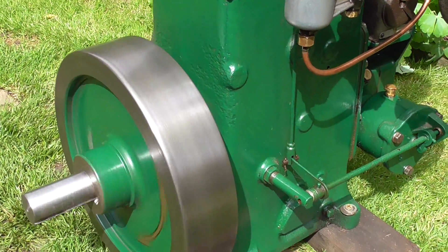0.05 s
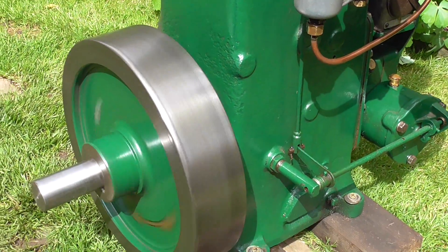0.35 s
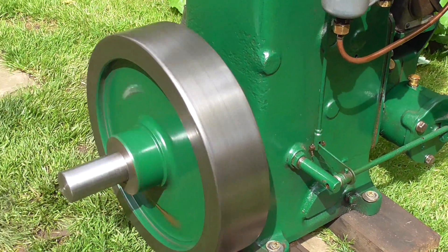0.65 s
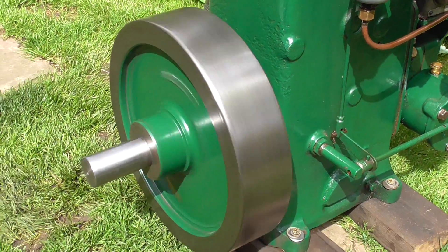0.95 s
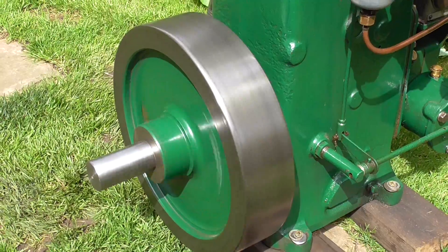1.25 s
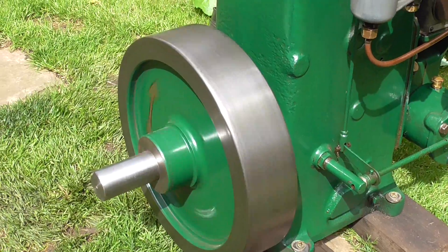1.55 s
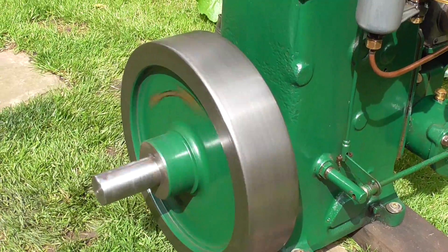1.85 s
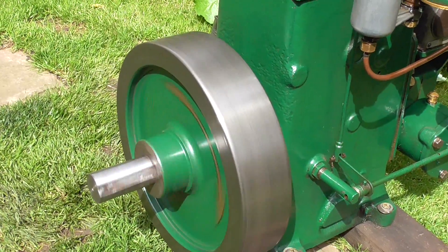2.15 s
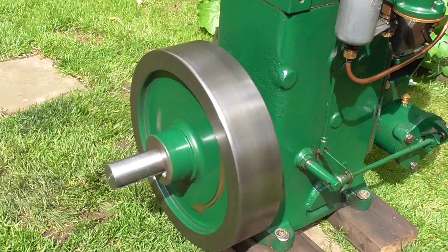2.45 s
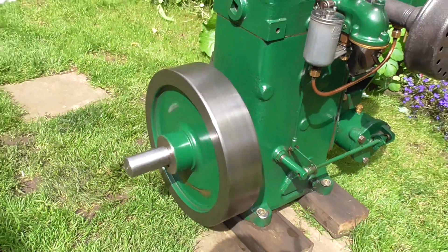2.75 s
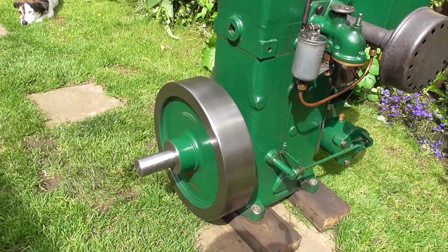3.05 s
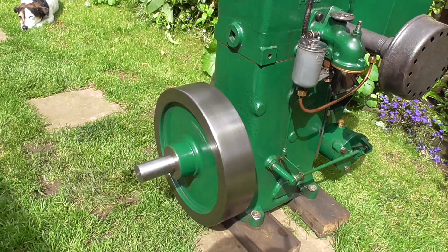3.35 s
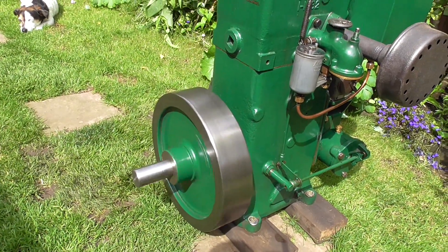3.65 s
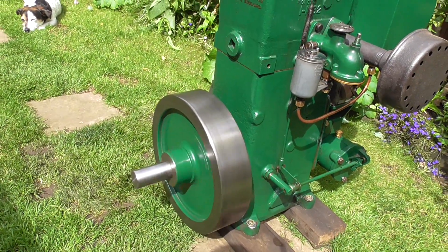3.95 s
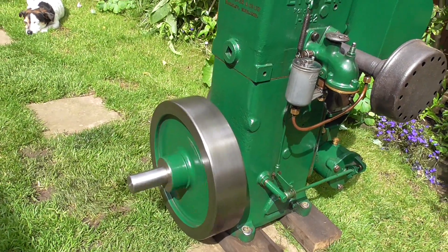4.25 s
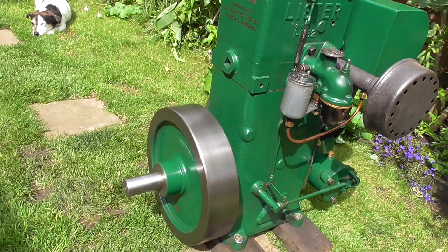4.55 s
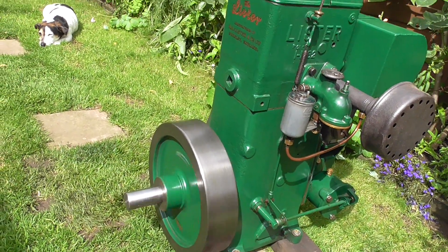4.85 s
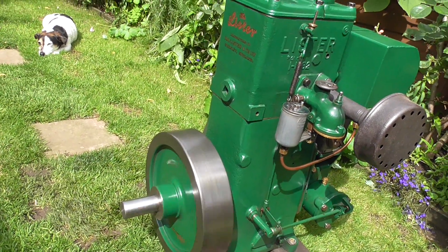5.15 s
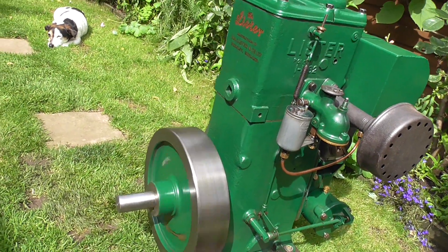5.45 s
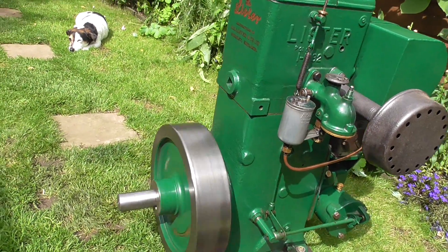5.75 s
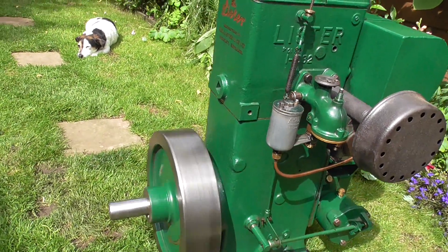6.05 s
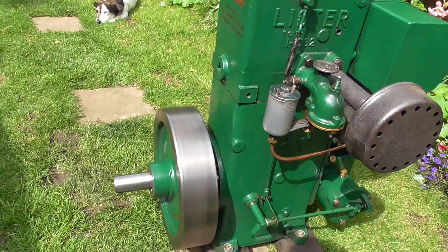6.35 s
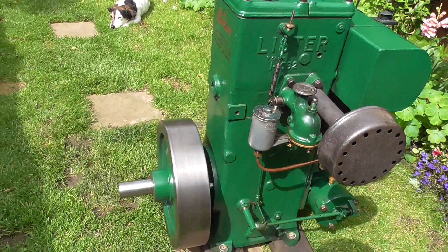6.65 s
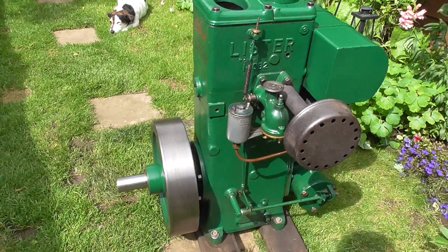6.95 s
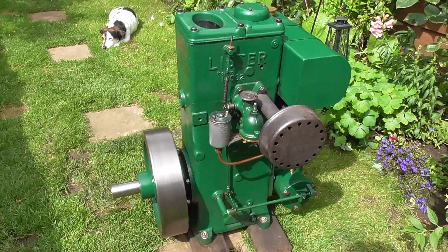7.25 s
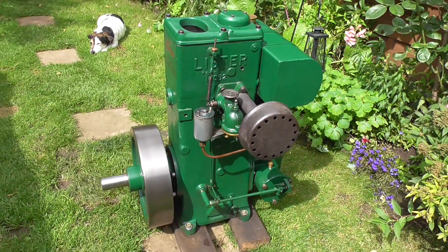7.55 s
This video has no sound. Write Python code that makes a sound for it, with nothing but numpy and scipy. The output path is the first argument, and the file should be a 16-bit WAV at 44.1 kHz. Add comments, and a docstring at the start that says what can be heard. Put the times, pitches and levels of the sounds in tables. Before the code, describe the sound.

A single-cylinder stationary engine runs steadily on a lawn, about a metre from the microphone. Its exhaust barks roughly eight times a second, each beat with a thump and a raspy puff, and now and then a firing is weaker. Valves and rods clatter, the iron body rings faintly and bearings whirr beneath. Near the end the microphone moves round to the silencer, and the sound becomes sharper and hissier.

```python
"""The exhaust of a single-cylinder four-stroke engine barks on a lawn, a metre away, at about 1000 rpm.
Once in two turns the blowdown excites the drum silencer's resonances, with a thump and a turbulent jet;
every few cycles the firing is weak. The intake gulps air, valve-gear impacts ring the iron casting and
the flywheel, and bearings and gears whirr beneath. Late on, the listener steps round from the flywheel
side to face the silencer, and the directivity of the sources changes the timbre."""
import sys
import numpy as np
from scipy import signal
from scipy.fft import rfft, irfft
from scipy.io import wavfile

SR = 44100
rng = np.random.default_rng(int(sys.argv[2]) if len(sys.argv) > 2 else 0)


def dump_mix(stems):
    """Bounce the given channels to the path in sys.argv[1] as a 16-bit WAV at rate SR."""
    frames = np.atleast_2d(stems).T  # one column per channel
    limited = np.clip(frames, -1, 1)  # hard clip at full scale
    pcm = np.round(limited * 32767).astype(np.int16)
    wavfile.write(sys.argv[1], SR, pcm)


N = 334713
CYCLES = 64
HZ = np.fft.rfftfreq(N, 1 / SR)
AGE_MS = np.arange(int(.4 * SR)) * 1000 / SR  # time axis of one event
FULL_JET_DB = 3.74

# spectrum of a tappet or rod-joint impact: (frequency [Hz], level [dB])
TAPPET_SPECTRUM = [(500, -21), (1700, -22.5), (2500, -33), (3500, -25.5), (4600, -18.5), (6000, -47),
                   (9000, -52), (13000, -60), (15500, -63)]
# treble trend, which each source follows in its own proportion: (time [s], level [dB])
TREBLE = [(0, -2.5), (3.4, -1.8), (5.2, 1.5), (6.5, 2.6), (7.5, 5.5)]


def undb(db):
    """Amplitude ratio of a level in decibels."""
    return 10 ** (np.asarray(db) / 20)


def along(points):
    """Interpolation of (frequency [Hz], value) points on a logarithmic frequency axis."""
    hz, value = np.transpose(points)
    return np.interp(np.log(HZ + 1), np.log(hz), value)


def follow(points, times):
    """Linear interpolation of each column of a (time [s], value, ...) table."""
    s, *columns = np.transpose(points)
    return np.array([np.interp(times, s, column) for column in columns])


def walk(hz):
    """Slow random modulation with a standard deviation near 1."""
    knots = np.arange(N) * hz / SR
    count = int(knots[-1]) + 2
    return 1.197 * np.interp(knots, np.arange(count), rng.standard_normal(count))


def scatter(spread):
    """Cycle-to-cycle variation: one Gaussian value for each cycle."""
    return spread * rng.standard_normal(CYCLES)


def ripple(spacing_hz, depth_db):
    """Modal overlap: the many small modes of the ironwork make its spectrum uneven."""
    knots = np.arange(0, SR / 2 + spacing_hz, spacing_hz)
    return undb(depth_db * np.interp(HZ, knots, rng.standard_normal(2000)[:len(knots)]))


def noise(gain, grain_db=0):
    """Shaped stereo noise, less coherent in the treble; fast amplitude modulation makes it crackle."""
    # side signal relative to mid: (frequency [Hz], level [dB])
    incoherence = [(100, -21), (500, -16.5), (1200, -14.5), (2500, -14), (4500, -10), (8000, -10),
                   (14000, -5)]
    mid, side = (rfft(rng.standard_normal(N) * undb(grain_db * walk(2500))) for _ in range(2))
    side = side * undb(along(incoherence))
    return irfft(np.array([mid + side, mid - side]) * gain, N) / np.std(irfft(mid, N))


def play(times, db, shapes):
    """Superposition of one shape, or one for each time, at the given times and levels."""
    pad = SR // 10
    out = np.zeros(N + 2 * pad + 2 * len(AGE_MS))
    shapes = np.broadcast_to(shapes, (len(times), len(AGE_MS)))
    for s, gain, shape in zip(times, undb(db), shapes):
        start = max(int(round(s * SR)) + pad, 0)
        out[start:start + len(shape)] += gain * shape
    return out[pad:pad + N]


def wave(delay_ms, hz, swell_ms, db):
    """A damped gas resonance that swells and dies within a few periods."""
    age = np.maximum(AGE_MS - delay_ms, 0)
    envelope = age / swell_ms * np.exp(1 - age / swell_ms)
    return undb(db) * envelope * np.sin(2 * np.pi * hz * age / 1000)


def burst(times, db, rise_ms, decay_ms):
    """Transient envelopes: a smooth rise and an exponential decay at each time."""
    shape = (1 - np.exp(-AGE_MS / rise_ms)) ** 2 * np.exp(-AGE_MS / decay_ms)
    return play(times, db, shape / shape.max())


def ring(times, db, modes):
    """Free vibration of struck metal: each blow excites the damped modes in different proportions."""
    age, out = AGE_MS / 1000, 0
    for hz, t60, mode_db in modes:
        mode = np.sin(2 * np.pi * hz * age) * np.exp(-np.log(1000) * age / t60)
        out = out + play(times, db + mode_db + scatter(1.7), mode)
    return out


def crank(degrees):
    """Angle is the integral of speed: each cycle's time [s] at this angle past exhaust opening."""
    # slow drift under the governor: (time [s], speed [rpm])
    speed = [(0.0, 1020.7), (0.6, 1016.9), (0.8, 1025.6), (1.5, 1025.0), (2.4, 1033.9), (2.9, 1020.6),
             (4.3, 992.4), (5.4, 986.1), (5.6, 980.9), (5.8, 996.7), (6.8, 1009.6), (7.5, 1010.5)]
    t = -0.009 + np.arange(8000) / 1000  # from the first exhaust opening
    turns = np.cumsum(follow(speed, t)[0] / 60) / 1000
    return np.interp(2 * np.arange(CYCLES) + degrees / 360, turns - turns[0], t)


def facing(times):
    """Listening angle: 0 beside the flywheel, 1 in front of the silencer."""
    return np.interp(times, [5.65, 6.4], [0, 1])


def beam(x, treble_db, presence_share):
    """Directivity: the top octave beams forward, while the band near 4 kHz leaves by the flywheel side."""
    top = irfft(rfft(x) / (1 + (7000 / (HZ + 1)) ** 6), N)
    presence = irfft(rfft(x) * np.exp(-((HZ - 4200) / 900) ** 2), N)
    return x + top * (undb(treble_db) - 1) + presence * (undb(-presence_share * treble_db) - 1)


def bearings():
    """Friction in bearings and timing gears radiates a continuous, fluttering broadband whirr."""
    # whirr: (frequency [Hz], level [dB])
    spectrum = [(25, -57), (55, -39), (115, -21.5), (230, -22), (305, -28.5), (370, -20.5), (620, -19.5),
                (800, -26.5), (1200, -28), (2000, -37.5), (2800, -43), (4400, -36), (6000, -46.5),
                (8000, -38.5), (14500, -52)]
    whirr = noise(undb(along(spectrum)) * ripple(spacing_hz=25.64, depth_db=2), grain_db=1)
    return whirr * undb(2.53 * walk(60))


def flywheel(t):
    """Bell-like modes of the rim ring at each blow of the exhaust valve."""
    # rim modes: (frequency [Hz], T60 [s], level [dB])
    modes = [(487.3, 0.6, -37), (454.5, 0.22, -46)]
    # highest while the listener leans over the rim: (time [s], gain [dB])
    proximity = [(0, 8), (0.55, 8.5), (1.2, -1), (3.0, -6), (7.5, 1)]
    return ring(crank(230 + scatter(3.6)), 0, modes) * undb(follow(proximity, t)[0])


def casting():
    """Impact excitation: the iron body rings as the exhaust valve seats and the cam follower lands."""
    # crankcase and water hopper modes: (frequency [Hz], T60 [s], level [dB])
    modes = [(358.5, 1, -43.5), (389, 0.46, -47.5), (559, 0.28, -46), (603, 0.54, -49), (657, 0.45, -46),
             (813, .25, -60), (1016, 0.23, -47), (1190, .25, -46), (1340, 0.21, -66), (1616, 0.084, -40.5),
             (1707, 0.081, -37.5), (3870, 0.1, -47.5), (3860, .08, -45), (4450, 0.052, -39.5),
             (4960, .05, -43)]
    seating = ring(crank(230 + scatter(3)), 0, modes)
    landing = ring(crank(350.4 + scatter(3)), -5, modes)
    return seating + landing


def linkage():
    """Backlash: loose rod joints tick three times a cycle while the valves move."""
    ticks = 0
    for _ in range(3):
        times = crank(rng.uniform(174, 400, CYCLES))
        ticks = ticks + burst(times, 0.5 + scatter(3.2), rise_ms=0.21, decay_ms=0.97)
    return ticks * noise(undb(along(TAPPET_SPECTRUM)))


def valve_gear():
    """Impact noise: tappet, valves and cam follower knock near set crank angles, never twice alike."""
    # spectra of the impacts: (frequency [Hz], level [dB])
    exhaust_seat = [(120, -41), (450, -13), (1000, -12), (1400, -26.5), (1720, -17), (1950, -37),
                    (2250, -18.5), (2800, -29), (4300, -24), (6000, -32.5), (7600, -25), (9000, -30.5),
                    (12000, -32), (15000, -77)]
    follower = [(120, -48.5), (450, -28), (900, -24), (1700, -28), (2900, -37.5), (3950, -19), (4700, -46),
                (6500, -26.5), (9000, -36.5), (15000, -40)]
    inlet_seat = [(500, -21), (1600, -23.5), (3000, -32.5), (4300, -25), (6000, -44.5), (8000, -23),
                  (11500, -23), (13000, -29), (15500, -44)]
    out, iron = 0, ripple(spacing_hz=149, depth_db=-0.5)
    for degrees, rise_ms, decay_ms, spectrum in [
            (187, 0.77, 3.1, TAPPET_SPECTRUM), (230, 0.54, 13.7, exhaust_seat),
            (350.4, 4.7, 5.6, follower), (397, 1.34, 3.6, inlet_seat)]:
        knocks = burst(crank(degrees + scatter(2.7)), scatter(1.6), rise_ms, decay_ms)
        out = out + knocks * noise(undb(along(spectrum)) * iron, grain_db=1.5)
    return out


def intake(opens, db):
    """Suction draws a turbulent gulp through the carburettor, which hoots briefly and always hisses."""
    # inrushing air: (frequency [Hz], level [dB])
    gulp_spectrum = [(100, -42), (300, -6), (560, -6), (800, -9), (1200, -12), (2000, -23.5), (6000, -33)]
    # narrow hiss bands: (frequency [Hz], bandwidth [Hz], level [dB])
    bands = [(7560, 400, -30.5), (12760, 340, -33.5), (15550, 450, -44)]
    hoot = play(opens + scatter(0.00012), db, wave(delay_ms=28.5, hz=595.5, swell_ms=5.5, db=-17.5))
    gulp = burst(crank(157), db, rise_ms=2.5, decay_ms=5.8) * noise(undb(along(gulp_spectrum)))
    hiss = noise(sum(undb(level) / (1 + (2 * (HZ - hz) / width) ** 2) for hz, width, level in bands))
    return hoot + gulp + hiss * undb(2 * walk(25))


def firings(opens):
    """Combustion variability and listening angle set each cycle's levels [dB] and outflow lag [ms]."""
    # late or poor burns against a full firing: (time [s], crack [dB], drum [dB], thump [dB])
    weak_firings = [(0.11, -8, -5, 5.5), (0.34, -18, -5, 1.5), (0.58, -16, -7.5, 3), (1.05, -3, -0.5, -1.5),
                    (1.17, -9, -1, 0.5), (1.28, -10, -7, -2), (1.98, -8, -10.5, -4.5), (2.22, -9, -4, -2),
                    (2.45, -7, -15, -8), (3.51, -6, -10, -3), (4.11, -10, -20, -7.5), (4.59, -4, -19, -2.5),
                    (4.83, -12, -9, -3), (5.68, -4, -24, -7.5), (6.64, -9, -11, -3), (6.88, -16, -9, -4.5),
                    (7.12, -14, -4, -2), (7.36, -5, -26, -5)]
    change = np.zeros((CYCLES, 3))
    for s, *levels in weak_firings:
        change[np.argmin(abs(opens - s))] = levels
    crack, drum, thump = change.T
    front, treble_db = facing(opens), follow(TREBLE, opens)[0]
    crack_db = 0.3 + scatter(2.7) + crack + 2 * front
    drum_db = 0.33 + scatter(0.44) + drum - 7 * front
    thump_db = 0.71 + scatter(0.46) + thump - 2.5 * front
    lag_ms = 0.1 + 0.1 * thump  # a bigger slug of gas leaves the pipe later
    jet_db = FULL_JET_DB + scatter(1) + 0.34 * (crack + drum) + 0.96 * treble_db - 3 * front
    intake_db = -4.5 + scatter(1.34) + np.minimum(-0.9 * drum, 4.5) - 4 * front  # weak cycles gulp louder
    return crack_db, drum_db, thump_db, lag_ms, jet_db, intake_db


def shell(opens, drum_db):
    """Structural resonance: each pressure pulse rings the silencer's steel wall."""
    # wall modes: (frequency [Hz], T60 [s], level [dB])
    modes = [(260, 0.26, -31.5), (505, 0.45, -36), (627, 0.23, -26.5)]
    return ring(opens, drum_db, modes)


def whistle(opens, tone_hz=1120, bend_hz=71.4, peak_ms=18.45, width_ms=12.7):
    """Flow excitation: the silencer's upper mode sings hoarsely, bending as the piston expels gas."""
    bend = (scatter(bend_hz) + bend_hz / 2)[:, None] * (1 - np.minimum(AGE_MS / peak_ms, 2))
    hz = (tone_hz + scatter(38.4))[:, None] + bend
    rasp = .035 * rng.standard_normal(hz.shape)
    phase = np.cumsum(2 * np.pi * hz / SR + rasp, axis=1) + 2 * np.pi * scatter(0.99)[:, None]
    swell = np.exp(-((AGE_MS - peak_ms) / width_ms) ** 2) * np.minimum(AGE_MS / 5, 1)
    return play(opens, -26.5 + scatter(2.3), swell * np.sin(phase)) * undb(5.2 * walk(250))


def blare(opens, jet_db, front, side_hz=1145, front_hz=839):
    """Turbulence at the jet's height sounds a ragged tone whose pitch depends on the listening angle."""
    hz = side_hz + (front_hz - side_hz) * front + 130 * walk(500)
    envelope = burst(opens + 0.0051, -23 + jet_db / 2, rise_ms=1.8, decay_ms=3.14)
    return envelope * np.sin(2 * np.pi * np.cumsum(hz) / SR)


def face_chamber(opens, jet_db):
    """Cavity resonance: the blowdown rings the chamber behind the silencer's perforated face."""
    upper = wave(delay_ms=1, hz=815, swell_ms=3.5, db=-19)
    lower = wave(delay_ms=0, hz=429, swell_ms=3.5, db=-21.5)
    return -play(opens, jet_db - FULL_JET_DB, upper + lower)


def gas_jet(opens, jet_db):
    """Turbulent mixing: gas rushing from the silencer's holes hisses, then roars."""
    # the two stages of the jet: (frequency [Hz], level [dB])
    hiss_spectrum = [(300, -19.5), (1500, -23.5), (2900, -31.5), (3900, -24.5), (4700, -20), (5800, -31),
                     (7800, -21.5), (9000, -24), (11500, -41), (15500, -57)]
    roar_spectrum = [(100, -55), (300, -14), (600, 0.5), (800, -14), (1100, -5), (1400, -12.5),
                     (2000, -27.5), (4000, -36.5)]
    hiss = noise(undb(along(hiss_spectrum)) * ripple(spacing_hz=234, depth_db=0.5), grain_db=3)
    roar = noise(undb(along(roar_spectrum)))
    return (hiss * burst(opens + 0.00049, jet_db, rise_ms=5.2, decay_ms=3.22)
            + roar * burst(opens + 0.0048, jet_db / 2, rise_ms=1.55, decay_ms=3.44))


def exhaust(opens, crack_db, drum_db, thump_db, lag_ms):
    """Blowdown excites the silencer's air modes; the gas slug leaves, is sucked back and rebounds."""
    crack = wave(delay_ms=0.08, hz=958, swell_ms=1.1, db=-15.5)
    drum = wave(delay_ms=-0.22, hz=613.5, swell_ms=2.5, db=-7.5)
    outflow = wave(delay_ms=1.52, hz=101, swell_ms=5.5, db=-24)
    suction = wave(delay_ms=6.5, hz=129.5, swell_ms=5, db=-17.5)
    rebound = wave(delay_ms=11, hz=194.5, swell_ms=3.5, db=-16.5)
    bark = -play(opens, crack_db, crack) - play(opens, drum_db, drum)
    thump = play(opens + lag_ms / 1000, thump_db, outflow - suction + rebound)
    return bark + thump


def scene():
    """Free-field superposition of the engine's gas flow and vibrating metal."""
    # proximity of the listener: (time [s], engine block gain [dB], valve gear gain [dB])
    nearness = [(0, 4, 0.4), (0.6, 4, -0.2), (1.4, 2, -4), (2.4, 4, -0.4), (3.2, 1.2, -2), (4.3, 1.3, -3),
                (5.1, 2.7, 0.5), (6.3, 0, -3.5), (6.9, 0.8, -2.5), (7.5, 4.5, -1.2)]
    t, opens = np.arange(N) / SR, crank(0)
    crack_db, drum_db, thump_db, lag_ms, jet_db, intake_db = firings(opens)
    block_db, gear_db = follow(nearness, t)
    treble_db, front = follow(TREBLE, t)[0], facing(t)
    whirr = bearings()
    tones = whistle(opens) * undb(-0.55 * treble_db - 3.5 * front)  # strongest to the side
    tones += blare(opens, jet_db, front) * undb(0.13 * treble_db)
    pulses = exhaust(opens, crack_db, drum_db, thump_db, lag_ms) + front * face_chamber(opens, jet_db)
    gas = pulses + tones + gas_jet(opens, jet_db) + intake(opens, intake_db)
    gas = beam(gas, 0.37 * treble_db, presence_share=1.7)
    gear_treble_db = treble_db + front  # the valve gear faces forward
    clatter = beam(valve_gear() + linkage(), gear_treble_db, presence_share=0.58) * undb(gear_db)
    return gas + shell(opens, drum_db) + clatter + flywheel(t) + (casting() + whirr) * undb(block_db)


def record(dry, low_cut_hz=64, top_hz=15750):
    """Two closely spaced, band-limited receivers differ a little in level and phase."""
    # left minus right: (frequency [Hz], level [dB])
    balance = [(160, 1), (350, 0.5), (650, -0.5), (1200, -2), (2400, -0.2), (4400, -3.5), (8100, 3),
               (12000, -2.5), (15000, -1.5)]
    # lead of the left channel: (frequency [Hz], phase [rad])
    lead = [(170, -0.12), (450, -0.28), (780, -0.41), (1100, -0.39), (2800, -0.21), (7200, 0.19),
            (8270, -1.6), (9300, -1.5), (10100, -1.8), (11900, -0.93), (14200, -1), (15500, .6)]
    half = undb(along(balance) / 2) * np.exp(.5j * along(lead))
    low_cut = 1 / np.sqrt(1 + (low_cut_hz / (HZ + 1)) ** 4)
    stereo = irfft(rfft(dry) * low_cut * np.array([half, 1 / half]), N)
    return signal.sosfilt(signal.ellip(14, .1, 80, top_hz, fs=SR, output="sos"), stereo)


dry = scene()
out = record(dry)
dump_mix(out)
```